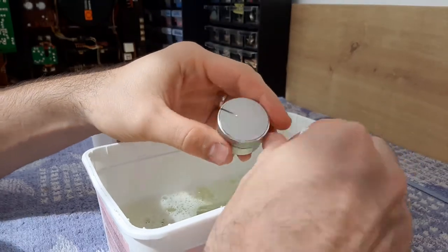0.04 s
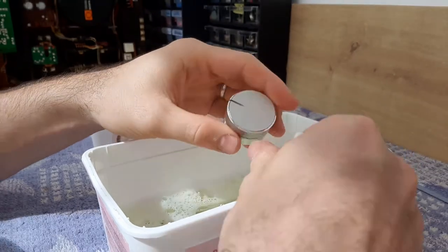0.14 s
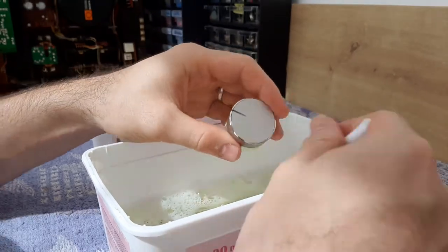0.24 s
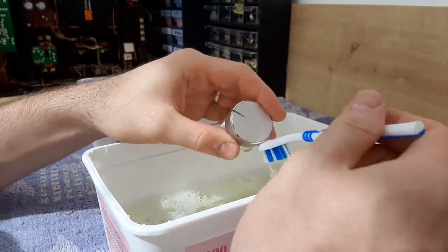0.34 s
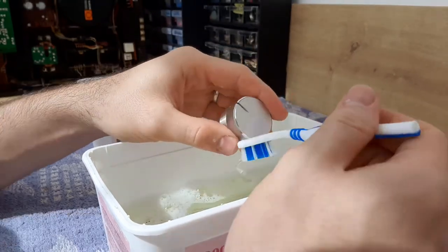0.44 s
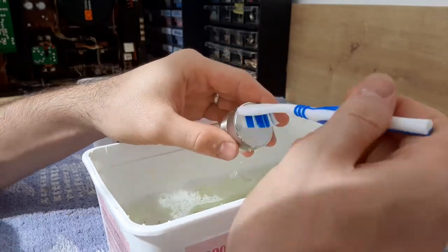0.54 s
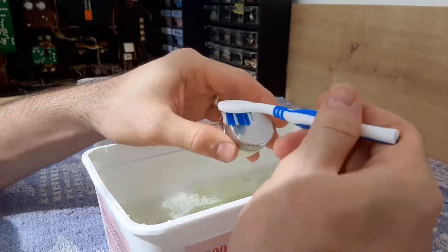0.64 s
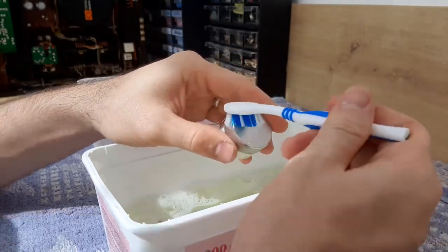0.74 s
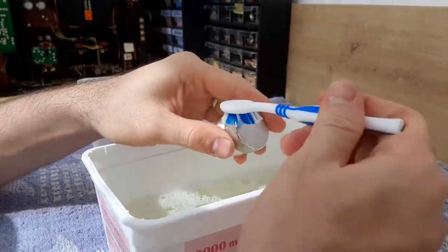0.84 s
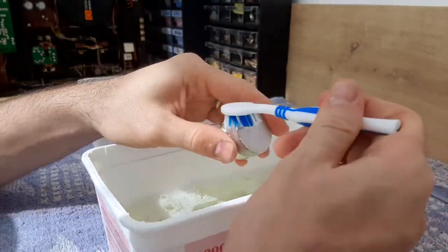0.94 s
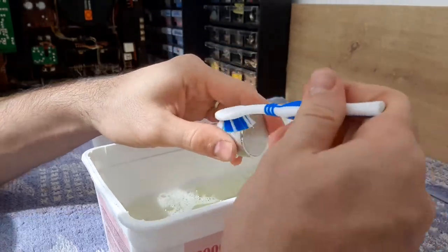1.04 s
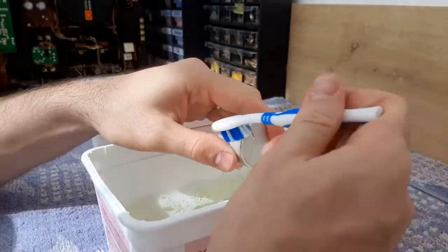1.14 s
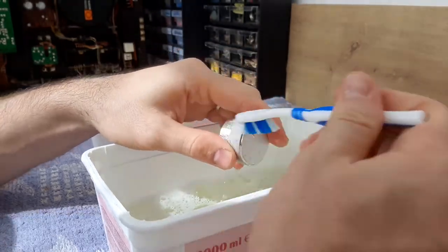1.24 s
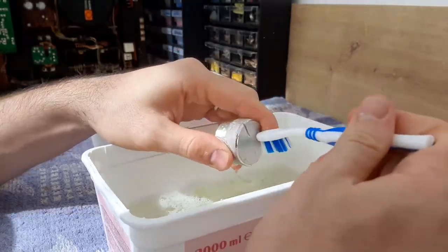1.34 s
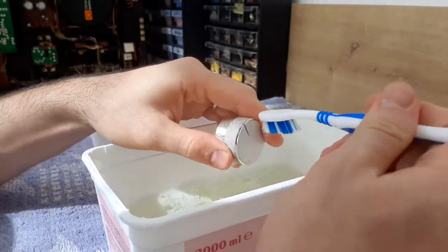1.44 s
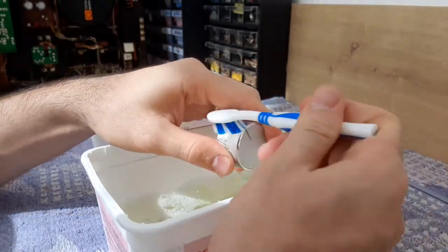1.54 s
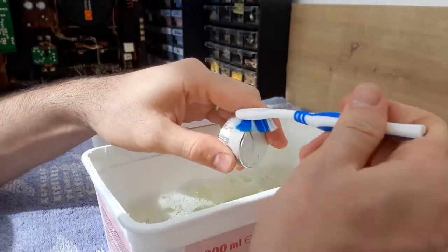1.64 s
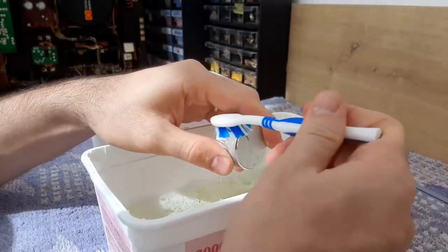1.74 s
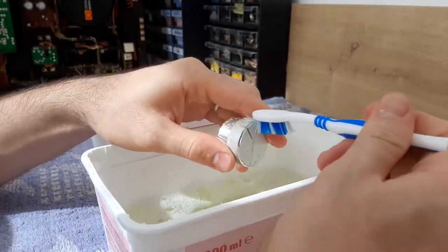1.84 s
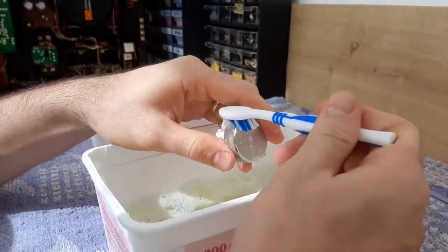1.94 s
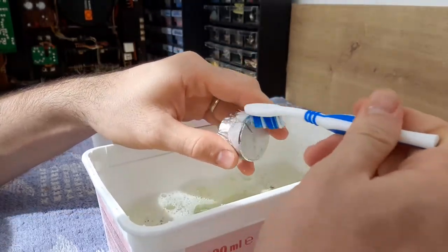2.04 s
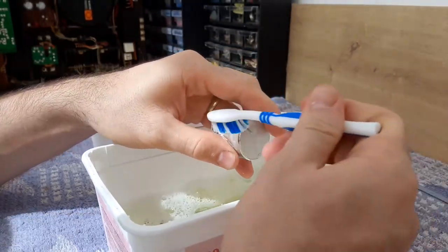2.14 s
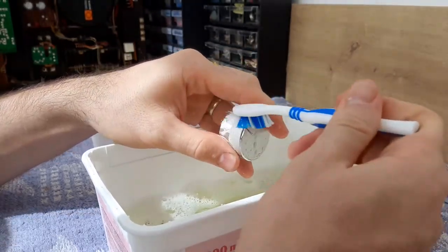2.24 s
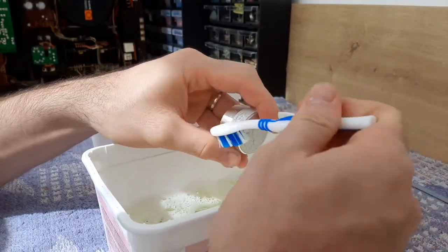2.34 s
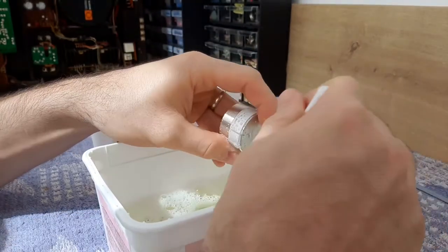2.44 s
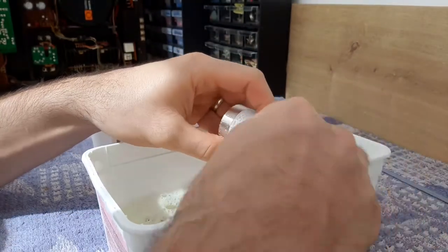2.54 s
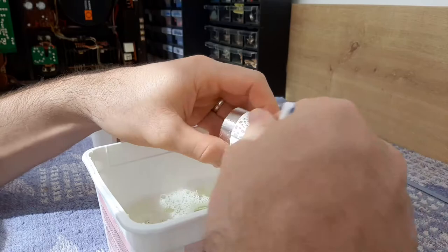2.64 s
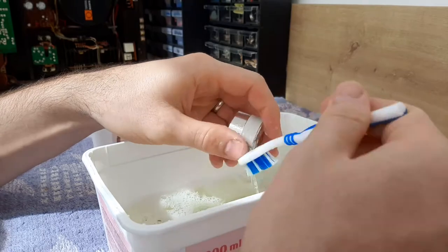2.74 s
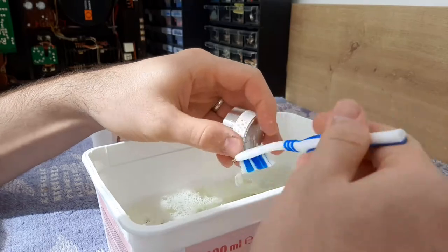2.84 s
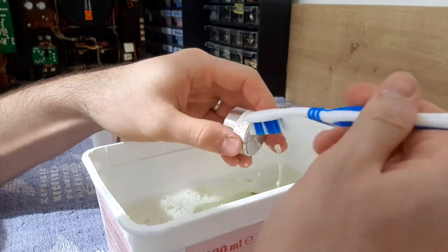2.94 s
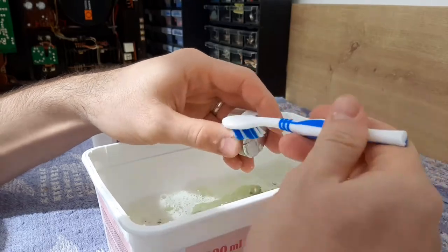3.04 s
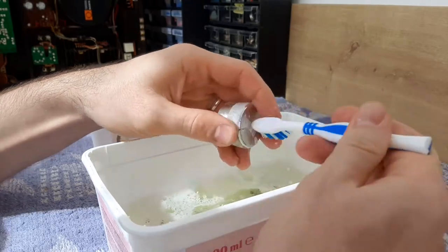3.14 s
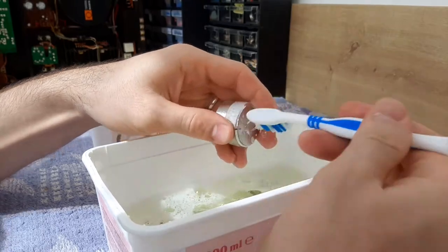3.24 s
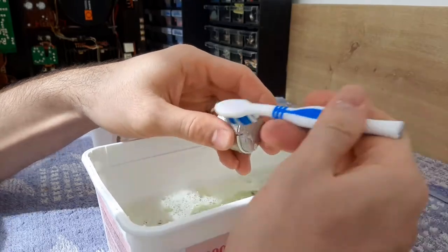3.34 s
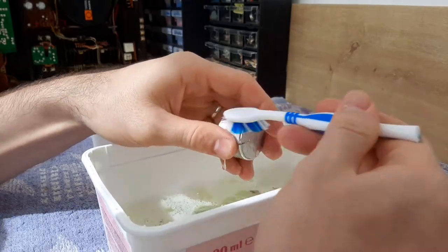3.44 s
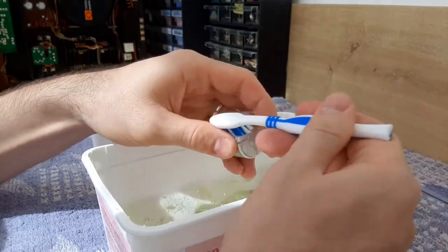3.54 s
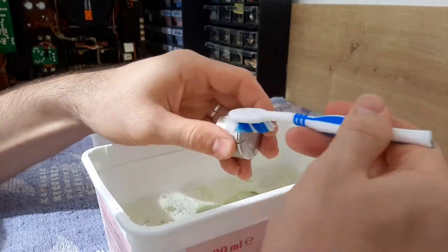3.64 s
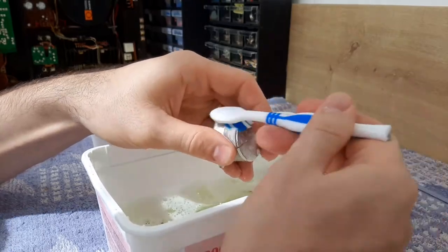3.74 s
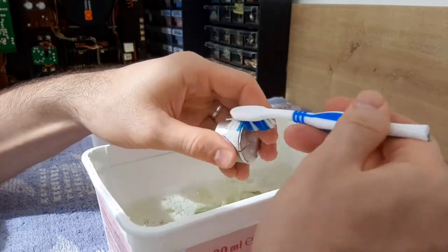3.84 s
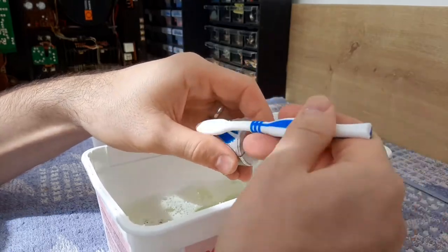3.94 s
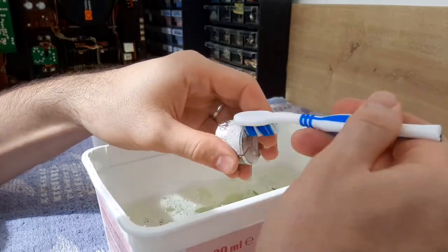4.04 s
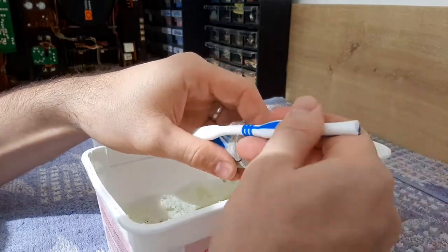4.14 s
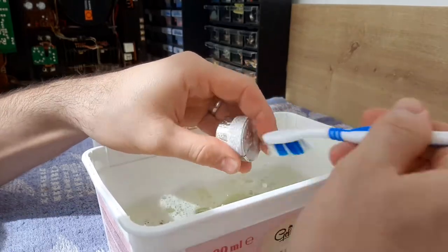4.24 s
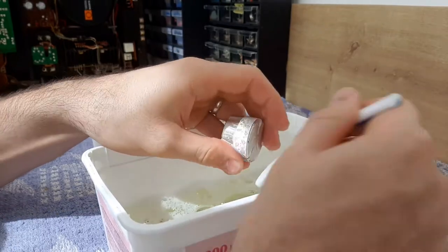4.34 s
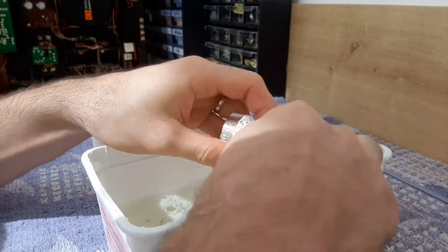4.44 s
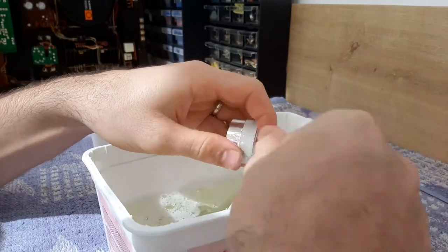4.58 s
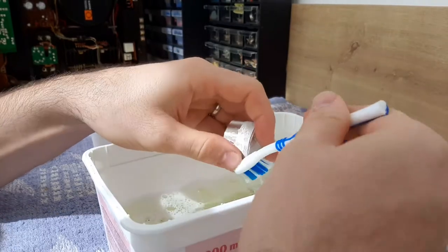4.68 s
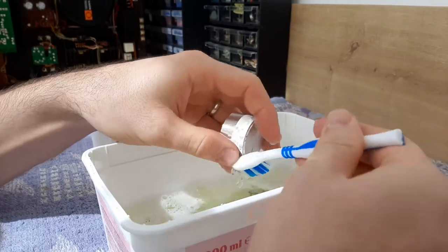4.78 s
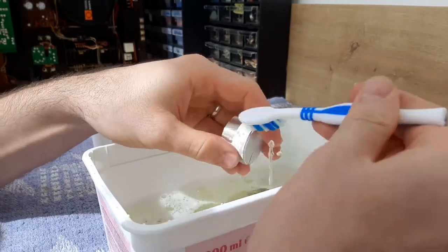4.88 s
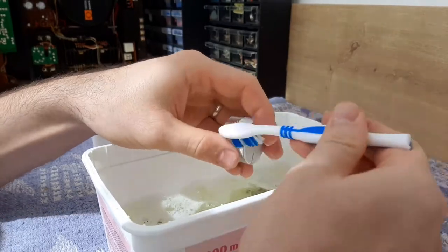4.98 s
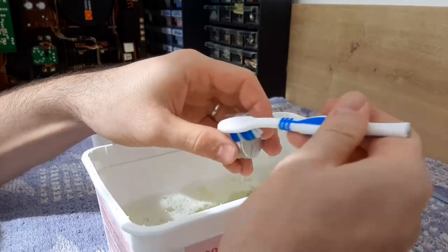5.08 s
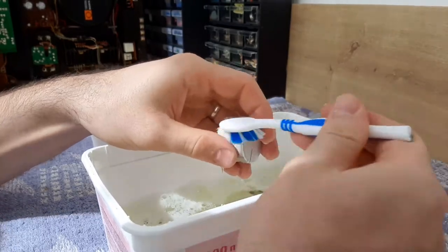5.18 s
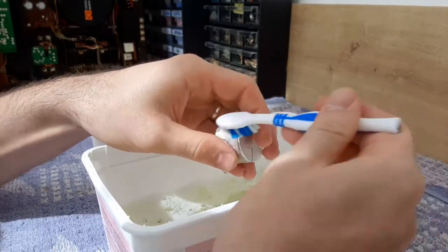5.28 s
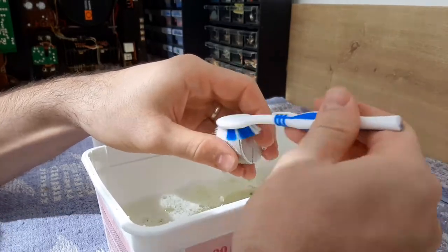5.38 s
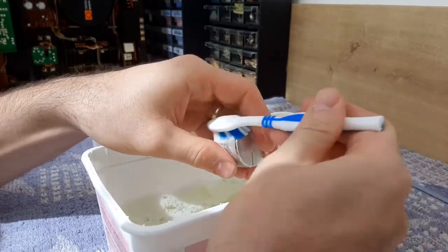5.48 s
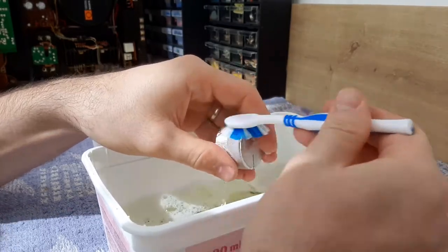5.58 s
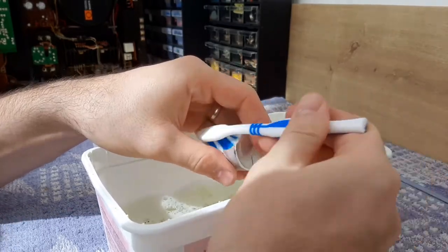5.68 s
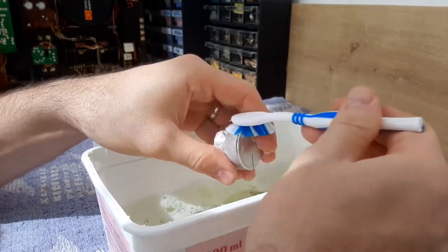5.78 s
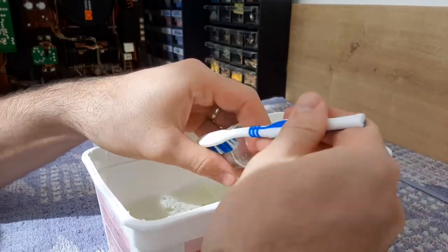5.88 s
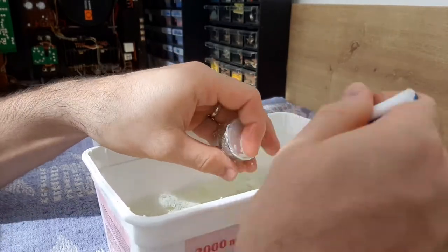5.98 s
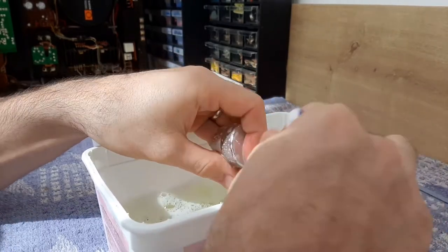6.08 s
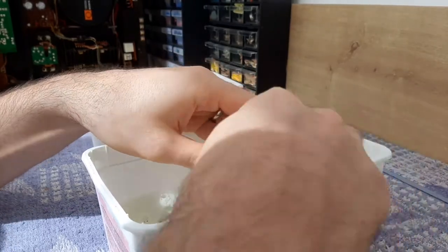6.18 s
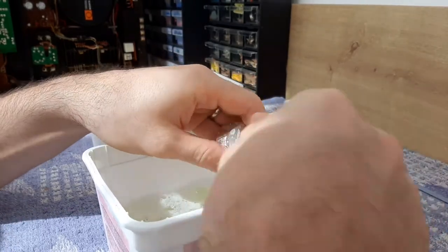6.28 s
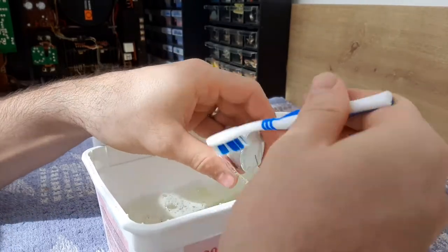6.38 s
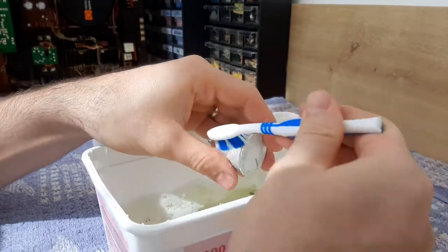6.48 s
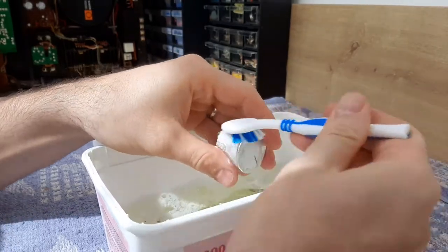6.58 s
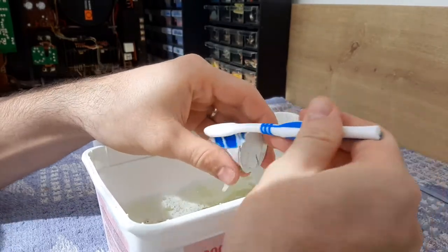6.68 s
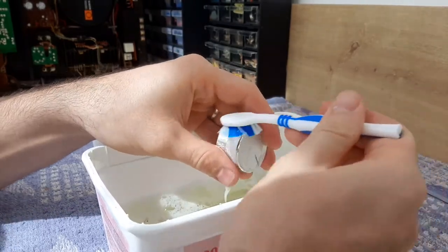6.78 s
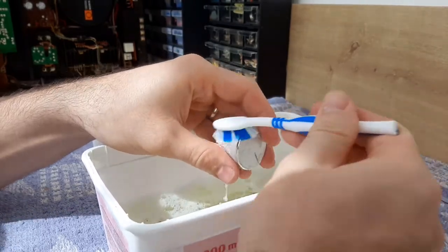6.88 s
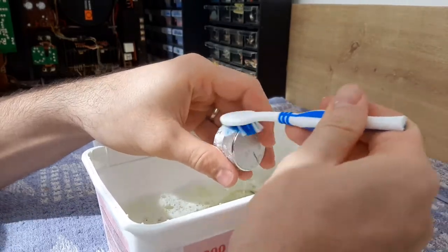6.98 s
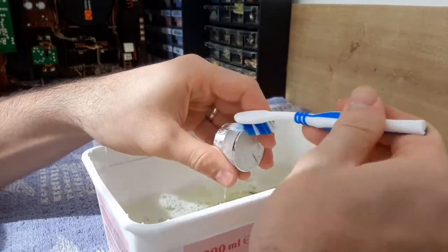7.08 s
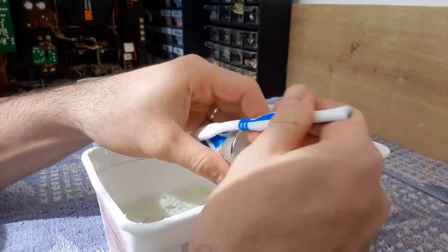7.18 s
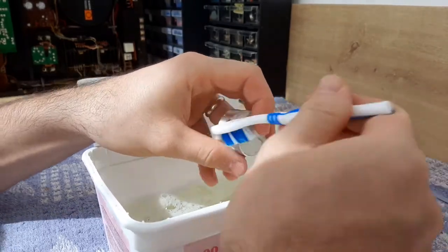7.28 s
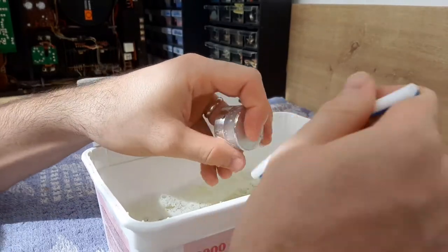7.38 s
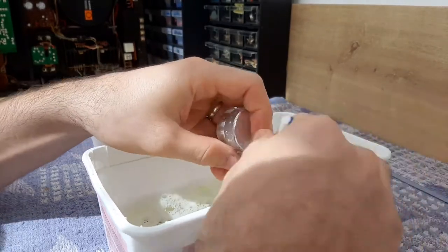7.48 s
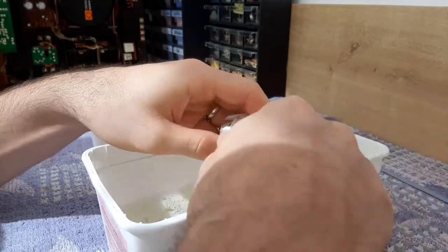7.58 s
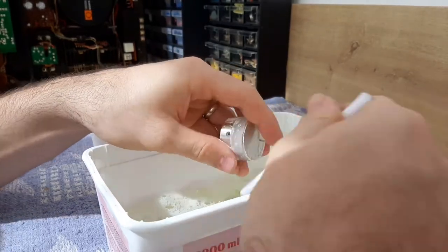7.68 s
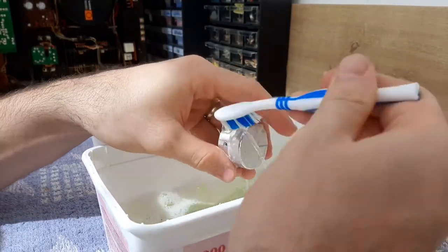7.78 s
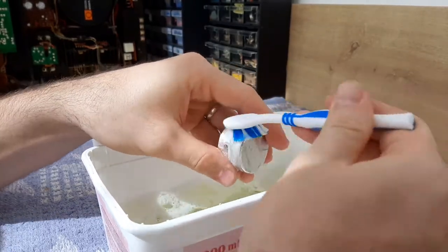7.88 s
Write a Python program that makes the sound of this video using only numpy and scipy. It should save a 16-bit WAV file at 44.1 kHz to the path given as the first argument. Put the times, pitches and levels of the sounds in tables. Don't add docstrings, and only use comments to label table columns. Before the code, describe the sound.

A faint rustle and tick lead into crisp bristle hiss, about ten strokes a second, on a small metal object over a plastic tub. The scrubbing stops and restarts several times, growing firmer after three seconds. Between bouts come clicks, hollow knocks and dull arm thumps through the table. Close, left-leaning stereo pickup, with light room hush and a short reverberation.

```python
import sys
import numpy as np
from scipy import signal
from scipy.fft import rfft, irfft, next_fast_len
from scipy.io import wavfile
from scipy.ndimage import uniform_filter1d

SR = 44100
rng = np.random.default_rng(int(sys.argv[2]) if len(sys.argv) > 2 else 0)


def gain_from_decibels(decibels):
    exponent = np.asarray(decibels, float) / 20
    return 10 ** exponent


def digitize_waveform(pressure):
    field = np.atleast_2d(pressure).T
    bounded = np.clip(field, -1, 1)
    quanta = np.round(bounded * 32767).astype(np.int16)
    wavfile.write(sys.argv[1], SR, quanta)


N = 349267
T = np.arange(N) / SR


def colour(x, points):
    hz, db = np.transpose(points)
    size = next_fast_len(x.shape[-1])
    f = np.maximum(np.arange(size // 2 + 1) * SR / size, 1)
    gain = gain_from_decibels(np.interp(np.log(f), np.log(hz), db))
    return irfft(rfft(x, size) * gain, size)[..., :x.shape[-1]]


def band(x, lo_hz, hi_hz):
    sos = signal.butter(2, [lo_hz, min(hi_hz, SR / 2.2)], "band", fs=SR, output="sos")
    return signal.sosfilt(sos, x)


def unit(x):
    return x / np.sqrt(np.mean(x ** 2))


def walk(rate):
    k = int(SR / rate)
    held = np.repeat(rng.standard_normal(N // k + 1), k)
    return unit(uniform_filter1d(held, k)[:N])


def add(out, s, sound):
    i = int(s * SR)
    out[..., i:i + sound.shape[-1]] += sound[..., :N - i]


def ports(x, pan_db):
    lag = 4
    return np.array([x * gain_from_decibels(pan_db / 2), np.roll(x, lag) * gain_from_decibels(-pan_db / 2)])


def room(x, tail_db):
    # f/Hz, t60/s
    room_decay = [(100, 0.39), (1000, 0.33), (4000, 0.29), (15000, 0.13)]
    decay_hz, decay_s = np.transpose(room_decay)
    t = np.arange(int(.45 * SR)) / SR
    tail = 0
    for hz in 50 * 1.5 ** np.arange(15):
        t60 = np.interp(np.log(hz), np.log(decay_hz), decay_s)
        hiss = band(rng.standard_normal((2, len(t))), hz, 1.462 * hz)
        tail = tail + hiss * np.exp(-np.log(1000) * t / t60)
    tail = tail * (1 - np.exp(-t / 0.00097))
    tail = gain_from_decibels(tail_db) * tail / np.linalg.norm(tail[0])
    return signal.fftconvolve(x[None], tail, axes=1)[:, :N]


def ring(modes, spot, db, t60_scale, rise_cycles):
    hz, base_db, t60 = np.array(modes).T[:, :, None]
    hz = hz * (1 + .025 * spot[::-1, None])
    t60 = t60 * t60_scale
    t = np.arange(int(t60.max() * SR)) / SR
    swell = 1 - np.exp(-t * hz / rise_cycles)
    decay = np.exp(-np.log(1000) * t / t60)
    level = gain_from_decibels(db + base_db + 2.37 * spot[:, None])
    return np.sum(level * swell * decay * np.sin(2 * np.pi * hz * t), axis=0)


def air():
    # f/Hz, level/dB per Hz
    hush_spectrum = [(18, -35), (30, -3), (135, -2), (181, -12.5), (443, -23), (814, -19.5), (1530, -38),
                     (2050, -23), (6550, -31.5), (15200, -41), (16500, -42)]
    hush = colour(rng.standard_normal((2, N)), hush_spectrum)
    drift = gain_from_decibels(-76.5 - 3.5 + 1.3 * walk(0.99))
    return hush * drift / np.std(band(hush, 1500, 15000))


def thump(hz):
    t = np.arange(2048) / SR
    turns = hz * t + 0.56 * (1 - np.exp(-t / 0.002))
    return -np.sin(2 * np.pi * turns) * np.exp(-t / 0.0071) * (1 - np.exp(-t / 0.0019))


def table():
    # f/Hz, level/dB, t60/s
    top_modes = [(60.6, -6, 0.39), (69.54, 1.5, 0.27), (82.34, 2.5, 0.23), (94.55, -2, 0.27),
                 (106.8, -2.5, 0.21), (136.6, -6, 0.74), (156, -2.5, 0.6), (258, -3.5, 0.054),
                 (286.5, -5.5, 0.56), (342.4, -7, 0.54), (403, -10.5, 0.25), (468.4, -10.5, 0.14)]
    # t/s, thump level/dB, deep boom level/dB
    forearm = [(.071, -47.5, -59), (.273, -60.5, -67), (.805, -51, -54), (.874, -46, -60),
               (1.014, -45.5, -49.5), (1.08, -45, -71), (1.208, -35, -56), (1.585, -26.5, -44.5),
               (1.772, -34.5, -76.5), (2.238, -47.5, -64), (2.532, -39, -35), (2.583, -28.5, -42),
               (2.858, -84, -59), (3.242, -48.5, -74), (4.047, -68.5, -43.5), (4.267, -38.5, -60.5),
               (4.445, -32.5, -30.5), (5.772, -51.5, -51.5), (5.907, -40.5, -62), (7.28, -32.5, -46),
               (7.498, -29, -33.5), (7.567, -28.5, -37.5)]
    wrist = [(1.29, -45, -52), (1.66, -36, -61), (2.161, -36, -46), (3.048, -34.5, -42.5),
             (3.401, -29, -40.5), (3.602, -40.5, -51.5), (3.794, -33, -48.5), (3.849, -44, -44),
             (3.963, -28.5, -45), (4.155, -29.5, -40), (4.543, -25, -35.5), (4.633, -30, -43.5),
             (5.127, -29.5, -43.5), (5.336, -29, -42.5), (5.523, -28, -42), (5.709, -28.5, -41.5),
             (6.069, -28.5, -45), (6.657, -32.5, -46), (6.85, -35.5, -45.5), (7.206, -26.5, -41)]
    knuckle = [
        (1.401, -62, -57),
        (3.501, -37.5, -54),
        (6.097, -12, -23),
        (6.205, -27.5, -34.5),
        (7.689, -36, -51),
        (7.866, -50, -47),
    ]
    # t/s, boom level/dB, rustle level/dB
    lean = [
        (0.0, -76, -76),
        (1.68, -66.5, -73.5),
        (2.05, -82.5, -92.5),
        (4.682, -53, -64),
        (4.922, -71.5, -87),
        (5.471, -62.5, -79.5),
        (7.24, -74.5, -77.5),
        (7.45, -68, -85),
        (7.92, -58, -78),
    ]
    boom, body = np.zeros(N), np.zeros(N)
    deep = [m for m in top_modes if m[0] < 125]
    upper = [m for m in top_modes if m[0] >= 125]
    bumps = []
    for rows, hz in ((forearm, 123), (wrist, 146), (knuckle, 211.6)):
        bumps += [(*row, hz) for row in rows]
    t = np.arange(SR // 3) / SR
    spots = rng.standard_normal((len(bumps), len(top_modes)))
    edges = rng.standard_normal((len(bumps), len(t))) * np.exp(-np.log(1000) * t / 0.38) * (t > .012)
    for (s, db, boom_db, hz), spot, edge in zip(bumps, spots, edges):
        add(boom, s, ring(deep, spot[:len(deep)], boom_db + 8.5, 1.14, 3.1))
        add(body, s, ring(upper, spot[len(deep):], db - 17.0, 0.84, 1.1))
        add(body, s + .002, gain_from_decibels(db + 4.0) * thump(hz))
        add(body, s, gain_from_decibels(db - 30.5) * signal.fftconvolve(edge, thump(hz)))

    s, boom_db, rustle_db = np.transpose(lean)
    murmur = np.zeros(N)
    for hz, db, _ in top_modes:
        murmur += gain_from_decibels(db) * unit(band(rng.standard_normal(N), hz * 0.893, hz * 1.123))
    body += unit(murmur) * gain_from_decibels(np.interp(T, s, boom_db) + 5.5 * walk(8.2))
    cloth = unit(band(rng.standard_normal(N), 750, 1700))
    rustle = cloth * gain_from_decibels(np.interp(T, s, rustle_db) + 1.0 * walk(30))
    far = .5 * boom + body + rustle
    return ports(boom, 7.5) + ports(body, 1.0) + ports(rustle, 2.5) + room(far, -11.5)


def tub():
    # f/Hz, level/dB, t60/s
    wall_modes = [(754, -16.5, 0.12), (824, -15, 0.072), (906, -7.5, 0.026), (1070, -13.5, 0.031),
                  (1240, -14, 0.024), (2154, -21, 0.041)]
    # t/s, level/dB, f/Hz
    rim_knocks = [(.365, -45, 1390), (1.357, -39, 982), (2.521, -54, 1010), (3.164, -52, 970),
                  (3.5, -39, 947), (4.556, -15.5, 890), (4.639, -19.5, 1070), (5.399, -49.5, 950),
                  (5.778, -36, 1080), (6.067, -45.5, 915), (6.088, -23, 934), (6.207, -37, 1100),
                  (6.956, -45.5, 1265), (7.28, -21.5, 890), (7.482, -40, 980), (7.683, -32.5, 980)]
    # t/s, level/dB
    wall_taps = [(2.561, -34), (2.584, -42), (3.056, -43), (3.14, -35.5), (3.401, -38.5), (3.462, -41),
                 (3.854, -42.5), (3.919, -43.5), (3.972, -41.5), (4.157, -40.5), (4.18, -41.5),
                 (4.227, -38), (4.268, -43.5), (4.483, -43.5), (4.506, -27), (5.336, -47.5), (5.733, -41),
                 (7.208, -31), (7.528, -37.5), (7.567, -25.5)]
    # t/s, level/dB, length/s, centre f/Hz
    wet_rubs = [(.0, -67.5, 0.27, 800), (1.04, -59.5, 1, 404), (1.375, -51.5, 0.11, 2580),
                (2.141, -68, 0.22, 790), (2.36, -70, 0.013, 2680), (2.528, -55.5, 0.18, 840),
                (3.172, -51.5, 0.08, 2330), (3.502, -57, 0.15, 2100), (4.575, -49.5, 0.14, 3540),
                (4.809, -58, .015, 3450), (4.828, -57, 0.033, 2760), (4.622, -37, 0.084, 355),
                (3.03, -59, 0.11, 750), (3.447, -61.5, 0.62, 1680), (4.153, -72, 0.061, 860),
                (4.511, -49, 0.048, 900), (4.55, -45.5, 0.088, 1100), (4.63, -38, 0.063, 910),
                (4.667, -59, 0.22, 575), (5.135, -58, 0.13, 590), (5.718, -58, 0.039, 890),
                (6.074, -45.5, 0.18, 836), (6.65, -56, 0.074, 800), (7.19, -61.5, 0.26, 900),
                (7.469, -57, 0.078, 970), (7.583, -59.5, 0.24, 860), (7.672, -50.5, 0.051, 940),
                (7.691, -61, 0.037, 3120)]
    out = np.zeros(N)
    knocks = rim_knocks + [(s, db, 836) for s, db in wall_taps]
    spots = rng.standard_normal((len(knocks), len(wall_modes) + 1))
    for (s, db, hz), spot in zip(knocks, spots):
        add(out, s, ring(wall_modes + [(hz, -2.5, .02)], spot, db - 0.5, 0.97, 0.67))
    grit = rng.standard_normal(N) * gain_from_decibels(4.35 * walk(160))
    for s, db, length, hz in wet_rubs:
        t = np.arange(int(1.4 * length * SR)) / (length * SR)
        rub = band(grit[int(s * SR):][:len(t)], hz / 2.56, hz * 2.0)
        rub = unit(band(rub, hz / 1.78, hz * 1.4))
        add(out, s, gain_from_decibels(db - 19.0 * t ** 2) * np.minimum(t / 0.04, 1) * rub)
    return ports(out, 6.0) + room(out, -6.5)


def ticks():
    # t/s, level/dB, f/Hz, bright part level/dB, airy part level/dB
    metal_ticks = [(.2864, -55, 4560, -77, -75), (.365, -30.5, 4070, -32, -31),
                   (.4662, -51, 4640, -48, -65), (.9632, -67, 4430, -50, -47),
                   (1.0131, -34, 5060, -44, -56), (1.3583, -25, 2690, -35, -36),
                   (2.5616, -60, 1770, -55.5, -59), (3.0324, -65, 3880, -62, -51),
                   (3.0944, -50, 3240, -53, -54), (3.1404, -19.5, 2690, -16.5, -25.5),
                   (3.362, -66, 2280, -69, -42.5), (3.4582, -49, 1910, -60, -57),
                   (4.2516, -35.5, 4520, -43.5, -35), (6.0965, -41, 2120, -43, -53.5),
                   (6.4734, -79, 4630, -47.5, -41.5), (3.756, -60, 4800, -47, -52),
                   (6.738, -48, 4500, -32.5, -43.5), (7.8506, -77.5, 4160, -55, -47)]
    # t/s, level/dB, f/Hz
    rim_ticks = [(.6464, -59, 2460), (1.967, -37, 4730), (2.378, -39, 2830), (2.6372, -45.5, 3020),
                 (3.1651, -25, 2410), (3.5014, -35.5, 3250), (3.5174, -40.5, 1830), (4.5062, -44, 2360),
                 (4.5533, -19, 3220), (4.5676, -29, 2030), (4.6843, -29, 4000), (4.8099, -46.5, 3700),
                 (5.9694, -33.5, 4930), (6.2073, -44, 1530), (7.3433, -31.5, 2920), (7.5662, -37.5, 2310)]
    heard = np.zeros((3, N))
    t = np.arange(1024) / SR
    hits = metal_ticks + [(s, db, hz, db - 20, db - 30.5) for s, db, hz in rim_ticks]
    rattles = rng.standard_normal((len(hits), 2, len(t)))
    rattles = np.pad(rattles, ((0, 0), (0, 1), (0, 0)))
    for (s, db, hz, bright_db, airy_db), rattle in zip(hits, rattles):
        crack = 2.2 * (t == 0) + rattle * (.5 * np.exp(-t / 0.000087) + 0.57 * np.exp(-t / 0.0021))
        note = band(crack, hz / 1.41, hz * 1.43) + 1.2 * band(crack, hz / 1.06, hz * 1.06)
        bright = band(crack, 5070, 9700)
        airy = band(crack, 9700, 14000)
        for part, part_db in ((note, db + 0.5), (bright, bright_db + 8.0), (airy, airy_db + 7.5)):
            add(heard, s, gain_from_decibels(part_db) * part / np.abs(part[0]).max())
    return ports(heard[0], 9.5) + np.outer([0, gain_from_decibels(-3.0)], heard[1]) + room(heard[2], -11)


def strokes():
    # t/s of middle, level/dB, half length/ms
    bout_1 = [
        (.714, -64.5, 40),
        (.823, -49.5, 13.4),
        (.907, -49.5, 34),
        (1.018, -40, 24.6),
        (1.112, -45, 19),
        (1.192, -44, 23.5),
        (1.287, -40, 28),
    ]
    bout_2 = [
        (1.577, -44.5, 25),
        (1.668, -41.5, 28),
        (1.765, -46, 23),
        (1.86, -40, 25),
        (1.965, -45.5, 29),
        (2.066, -44.5, 14.3),
        (2.154, -39.5, 24),
        (2.237, -40.5, 22.5),
        (2.329, -44.5, 29),
        (2.403, -42.5, 14.5),
    ]
    bout_3 = [(3.5, -39, 27.7), (3.576, -36.5, 17.7), (3.694, -42, 27), (3.784, -35.5, 25.3),
              (3.87, -45, 30), (3.965, -37.5, 21.6), (4.055, -37.5, 24.7), (4.153, -37, 23),
              (4.254, -37, 25)]
    bout_4 = [(5.048, -50, 26), (5.125, -41.5, 18), (5.242, -39.5, 24.4), (5.332, -34.5, 16.7),
              (5.434, -40, 27.6), (5.522, -38, 22), (5.614, -37.5, 23.5), (5.71, -37.5, 23.4),
              (5.801, -35, 22.7), (5.906, -39, 23.5), (5.97, -43, 17.4)]
    bout_5 = [
        (6.556, -42.5, 33),
        (6.645, -38.5, 24.3),
        (6.75, -42, 38),
        (6.848, -40.5, 19.4),
        (6.929, -37.5, 29),
        (7.029, -43, 20),
        (7.107, -43, 19.4),
        (7.211, -37, 31),
        (7.314, -34.5, 18.5),
        (7.91, -52.5, 21),
    ]
    bout_rasp_db = [-16, -13, -12.5, -15, -9]
    # t/s of peak, level/dB, fall/ms, low rasp/dB
    wet_swishes = [(.39, -54, 36, -4.5), (0.468, -57, 23, 2), (.52, -67, 21, 5.5), (1.36, -51, 7, 5),
                   (2.566, -67.5, 56, 1), (3.032, -63.5, 27, -14), (3.065, -67, 26, -5),
                   (3.105, -53, 23, -12), (3.13, -41.5, 11, -10), (3.404, -53, 30, -9.5),
                   (4.47, -67, 140, 1.5), (4.57, -63, 190, -1), (4.849, -68, 12, -4), (4.969, -51, 13, -14),
                   (6.11, -69.5, 72, 7.5), (6.494, -62, 27, -16), (7.353, -56, 11, -20),
                   (7.571, -63.5, 73, 1), (7.857, -54.5, 17, -11.5)]
    lean = 0.32
    rows = []
    for bout, rasp_db in zip([bout_1, bout_2, bout_3, bout_4, bout_5], bout_rasp_db):
        for s, db, ms in bout:
            rows.append((s + lean * ms / 1000, db, ms * (1 + lean), ms * (1 - lean), rasp_db))
    swish_rise_ms = 19
    return rows + [(s, db, swish_rise_ms, fall, rasp_db) for s, db, fall, rasp_db in wet_swishes]


def patchy(x, centres_hz, flicker_db, rate):
    size = next_fast_len(N)
    spectrum = rfft(x, size)
    f = np.arange(size // 2 + 1) * SR / size + 1
    out = 0
    for hz in centres_hz:
        part = irfft(spectrum * np.exp(-(np.log(f / hz) / .17) ** 2), size)[:, :N]
        out = out + part * gain_from_decibels(flicker_db * walk(rate))
    return out


def brush():
    # t/s, level/dB
    drag = [
        (0.0, -91.5),
        (1.21, -64.5),
        (3.2, -92),
        (3.86, -70.5),
        (4.7, -88),
        (5.73, -59.5),
        (6.35, -88.5),
        (6.77, -67),
        (7.92, -86),
    ]
    # f/Hz, level/dB per Hz
    click_spectrum = [(880, -52.5), (1500, -16), (2270, -11.5), (3480, -12.5), (4000, -4.5), (5380, -6),
                      (7100, -2.5), (9950, -5.5), (12000, -2), (15100, -1.5), (16000, -4.5)]
    force = gain_from_decibels(np.interp(T, *np.transpose(drag))) ** 2
    rasp = force * gain_from_decibels(-2.5) ** 2
    for s, db, rise, fall, rasp_db in strokes():
        near = slice(max(int((s - .15) * SR), 0), int((s + .2) * SR))
        before = T[near] < s
        away = np.abs(T[near] - s) * 1000 / np.where(before, rise, fall)
        push = gain_from_decibels(db - 1.5 - 8.1 * away ** np.where(before, 1.8, 2.6)) ** 2
        force[near] += push
        rasp[near] += push * gain_from_decibels(rasp_db) ** 2

    slipping = rng.random(N) < 12000 / SR
    slips = slipping * gain_from_decibels(1.4 * rng.exponential(size=N) + 1.2 * walk(250))
    tips = colour(slips * rng.standard_normal((2, N)), click_spectrum)
    hiss = unit(patchy(tips, 5600 * 1.22 ** np.arange(6), 2.6, 30))
    low = unit(patchy(tips, 2000 * 1.231 ** np.arange(5), 3.5, 35))
    facing, hidden = hiss * np.sqrt(force) * gain_from_decibels(-4.0) + low * np.sqrt(rasp) * gain_from_decibels(-4.0)
    direct = ports(facing, 18.14) * gain_from_decibels(-0.5) + np.outer([0, gain_from_decibels(2.0)], hidden)
    return direct + room(facing, -6) * gain_from_decibels(np.array([[2.5], [-2.5]]))


def scene():
    return air() + table() + tub() + ticks() + brush()


def roll_off(x):
    return signal.sosfilt(signal.butter(12, 16830, fs=SR, output="sos"), x)


def record(dry):
    low_cut = signal.butter(3, 47, "high", fs=SR, output="sos")
    top_cut = signal.ellip(8, .2, 50, 15850, fs=SR, output="sos")
    mix = signal.sosfilt(top_cut, signal.sosfilt(low_cut, dry))
    return roll_off(mix)


dry = scene()
out = record(dry)
digitize_waveform(out)
```